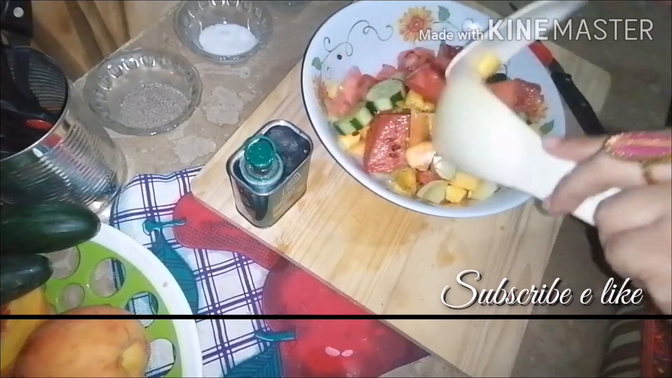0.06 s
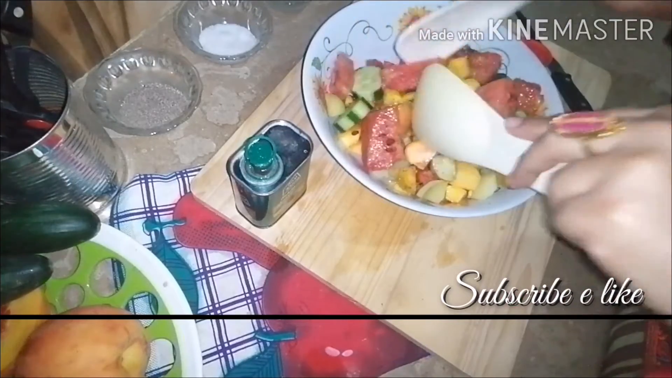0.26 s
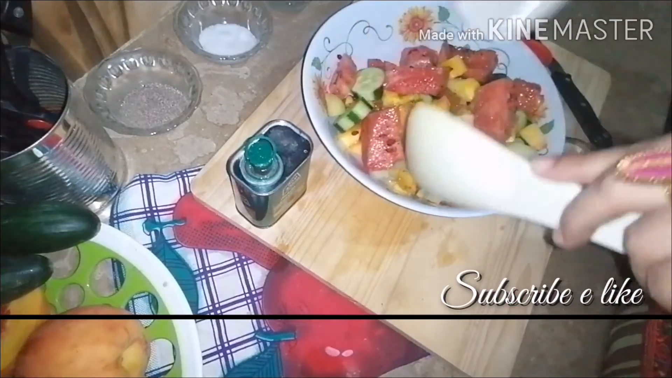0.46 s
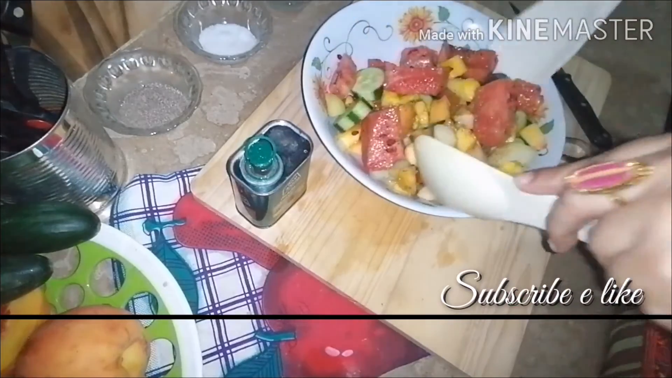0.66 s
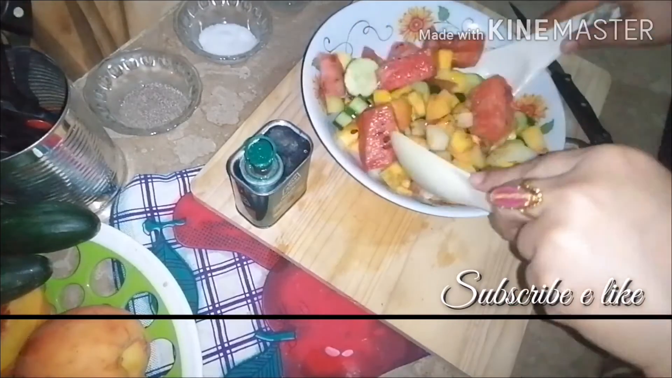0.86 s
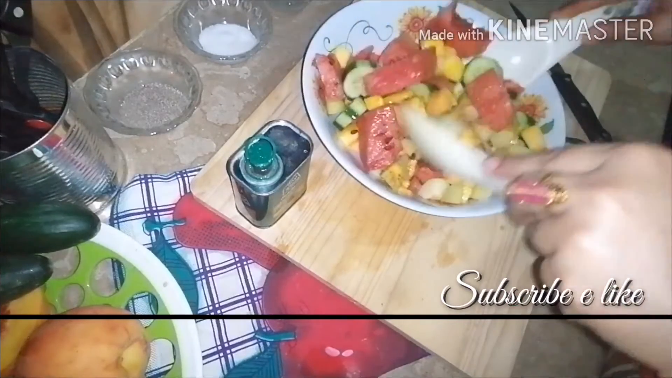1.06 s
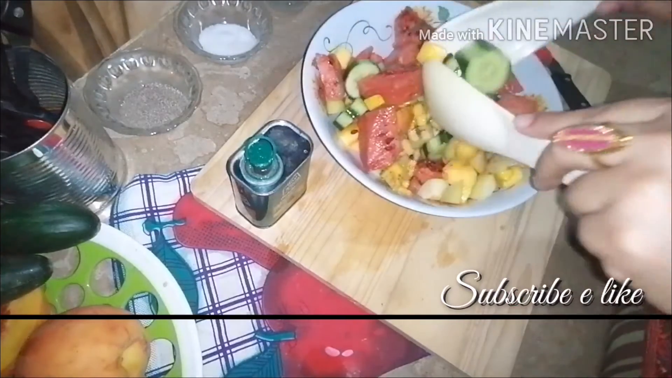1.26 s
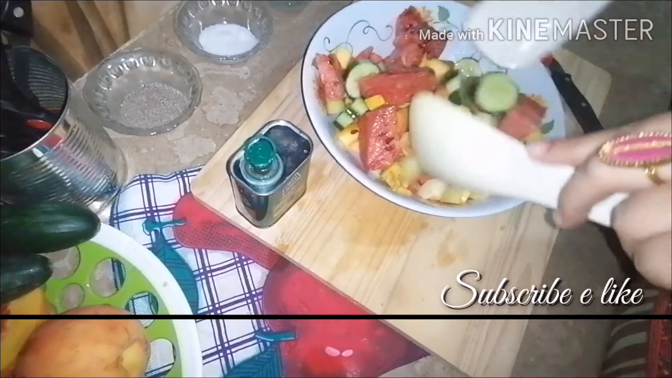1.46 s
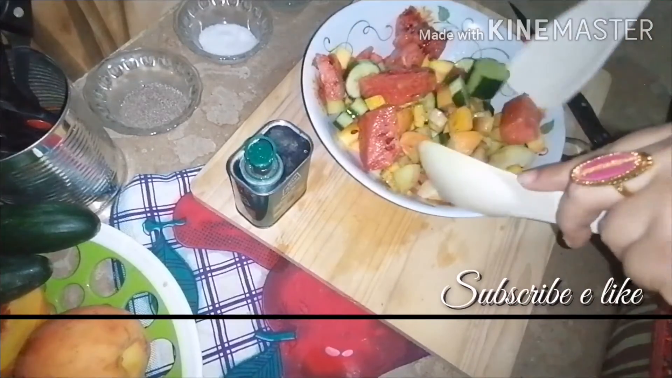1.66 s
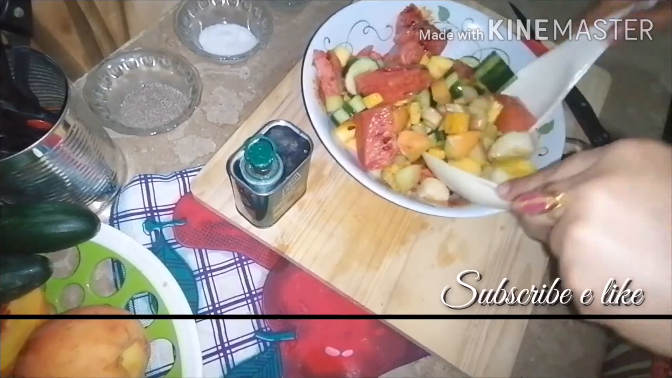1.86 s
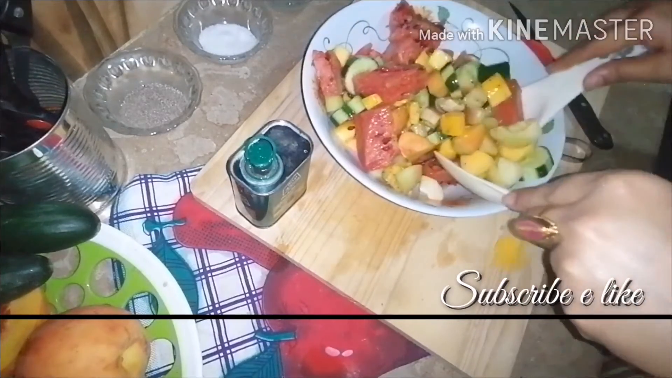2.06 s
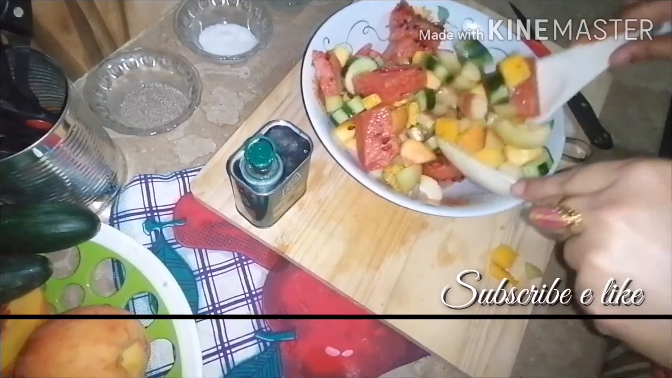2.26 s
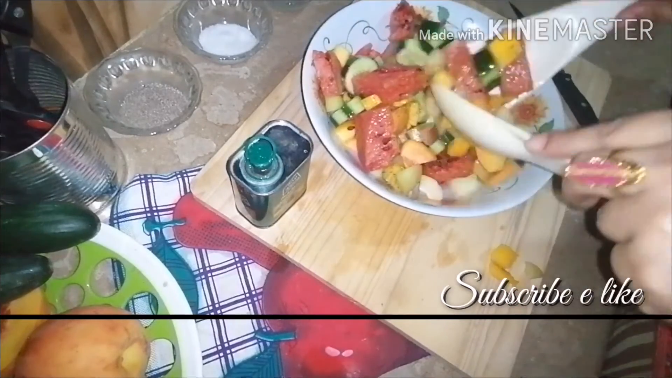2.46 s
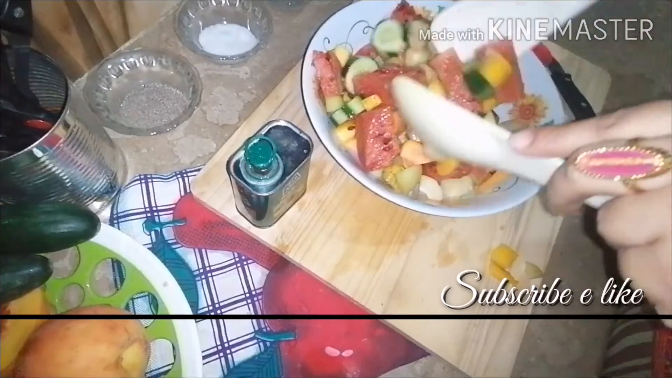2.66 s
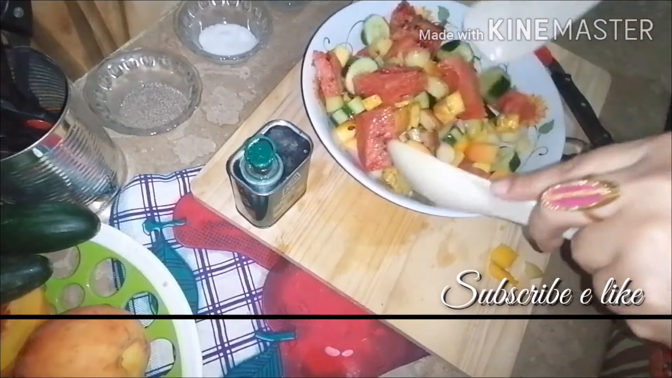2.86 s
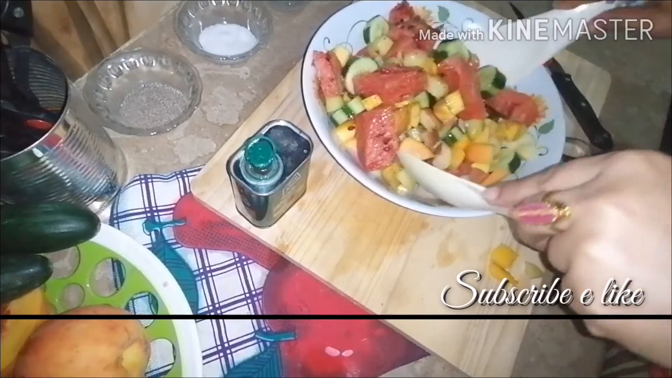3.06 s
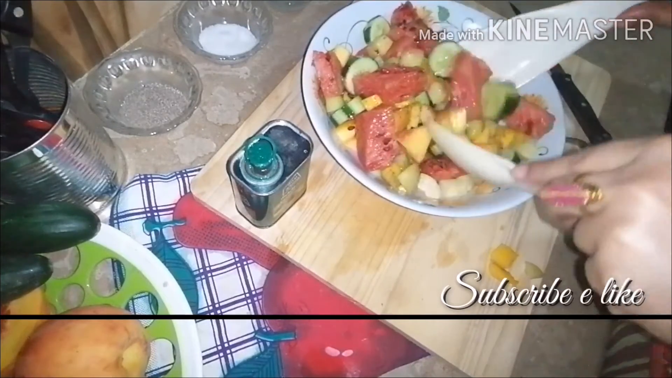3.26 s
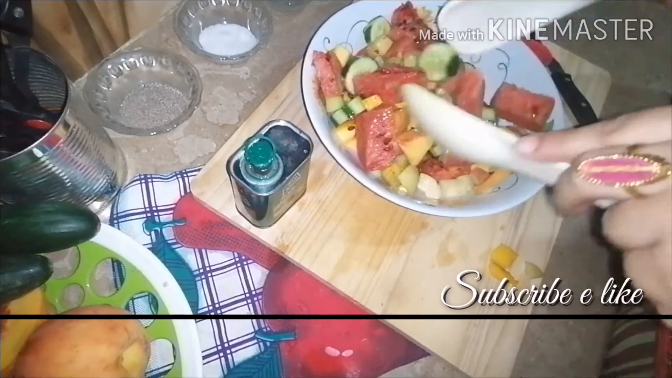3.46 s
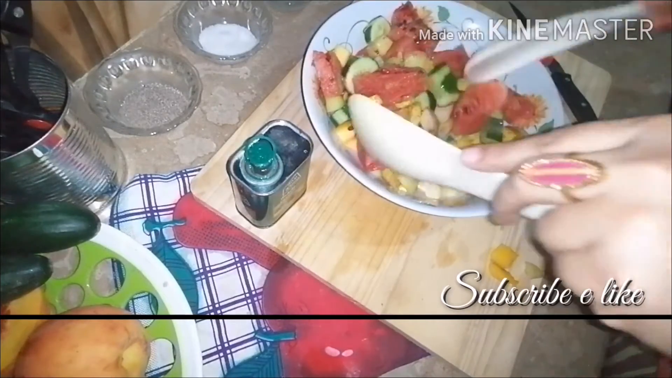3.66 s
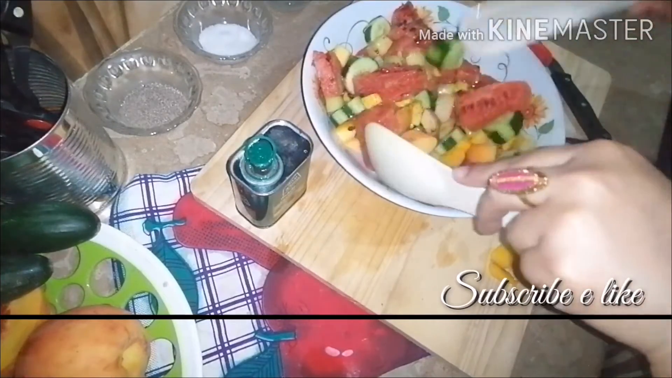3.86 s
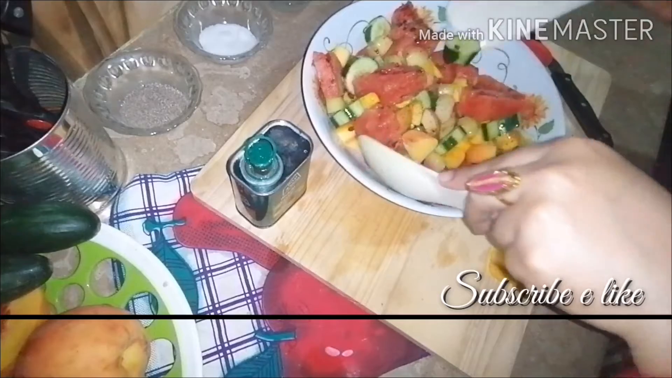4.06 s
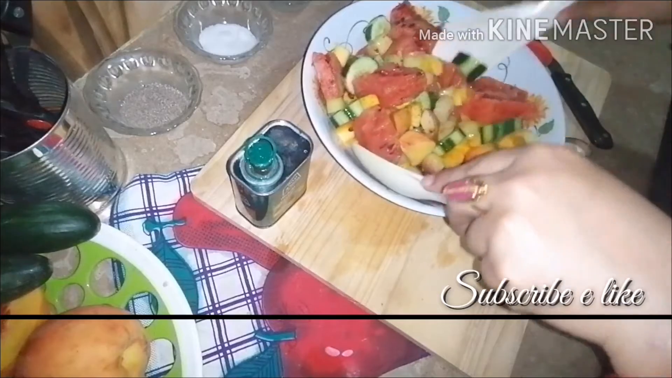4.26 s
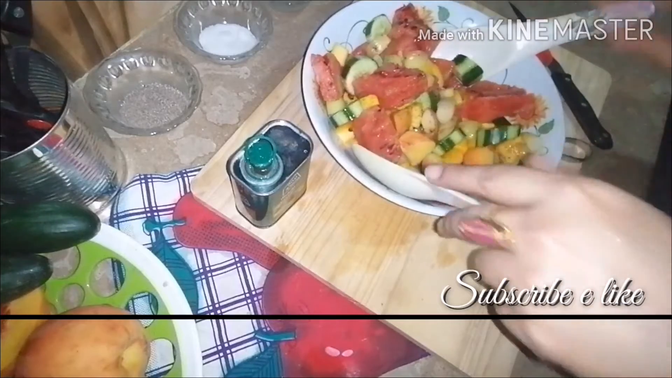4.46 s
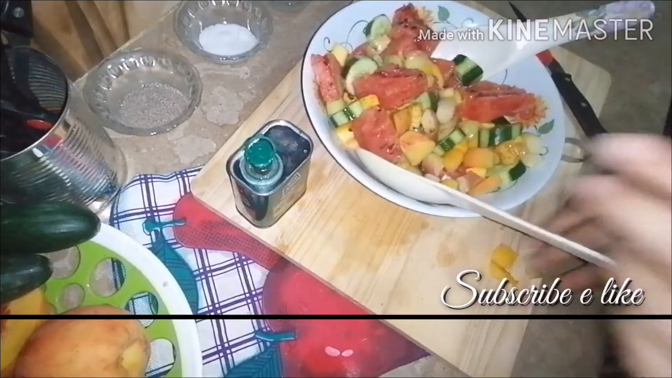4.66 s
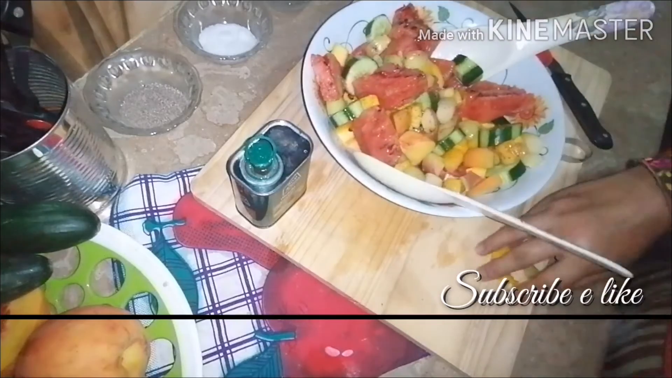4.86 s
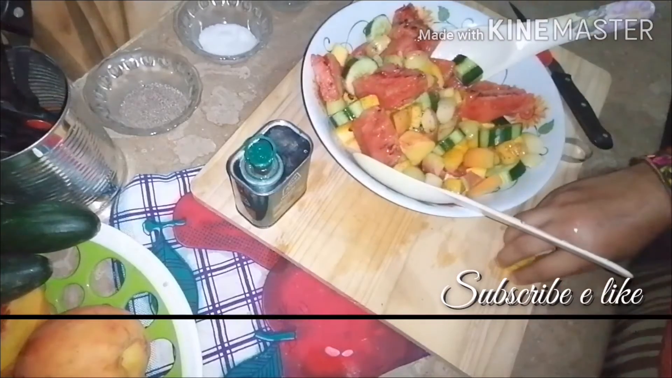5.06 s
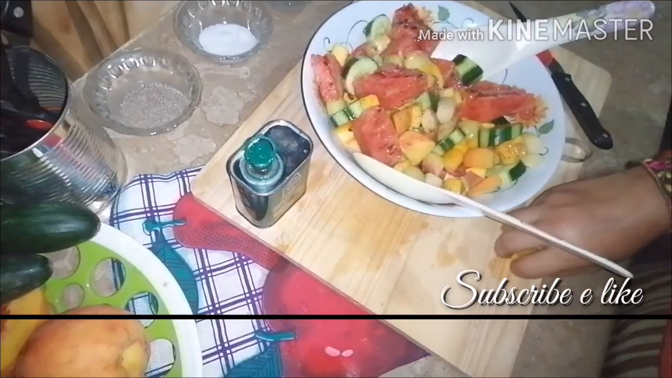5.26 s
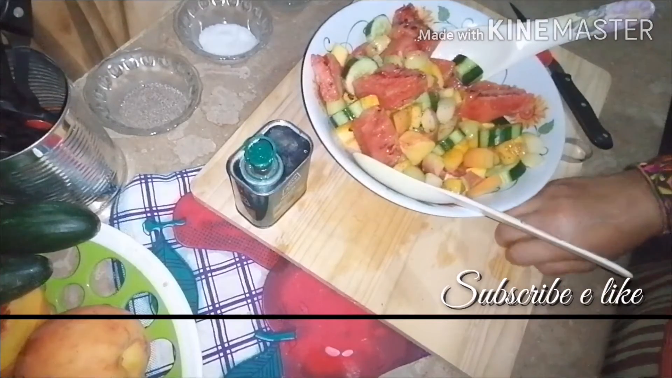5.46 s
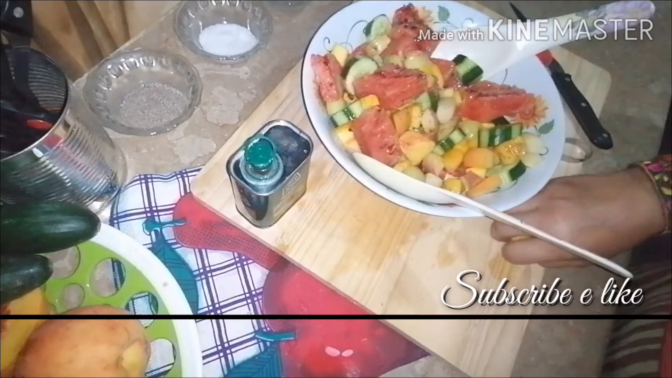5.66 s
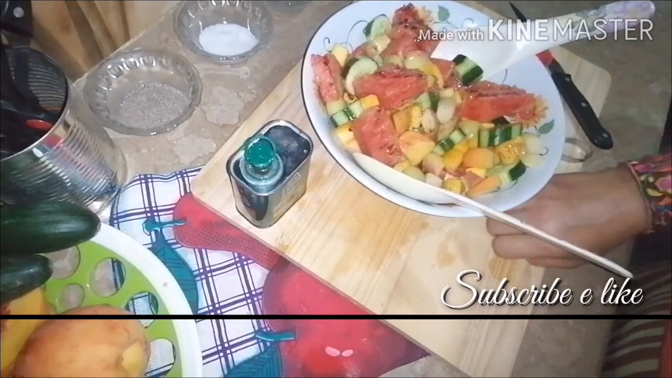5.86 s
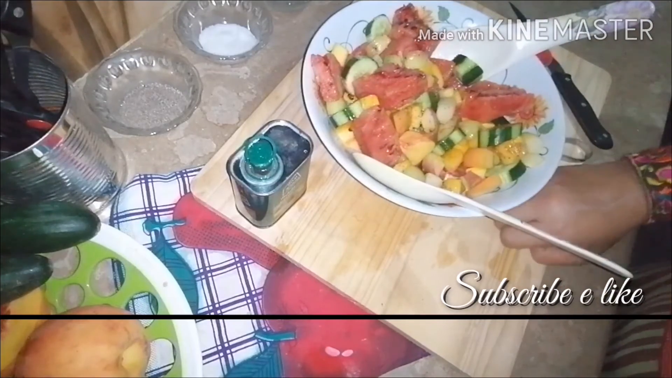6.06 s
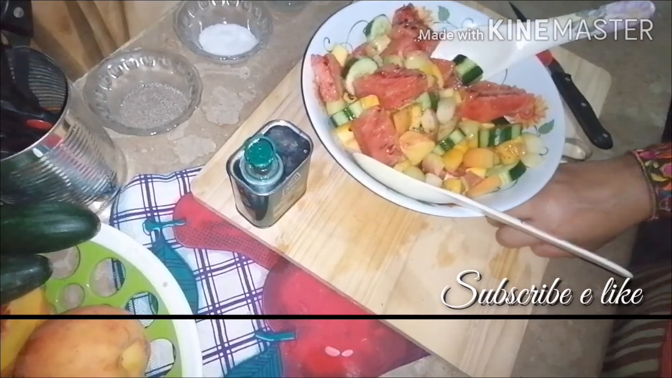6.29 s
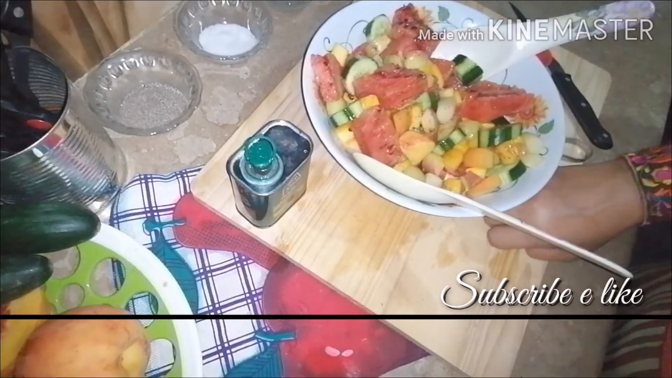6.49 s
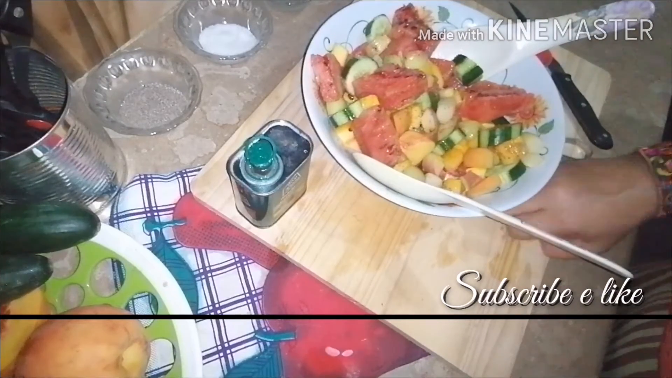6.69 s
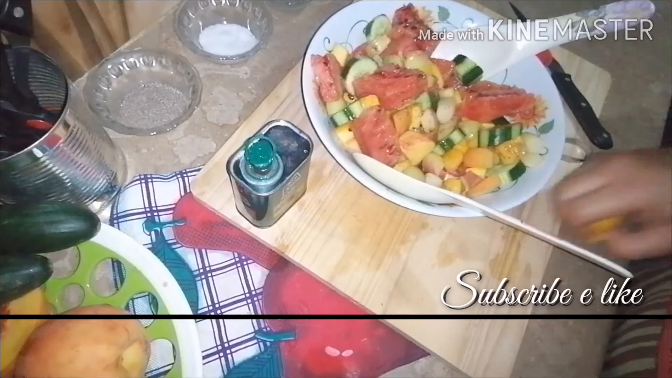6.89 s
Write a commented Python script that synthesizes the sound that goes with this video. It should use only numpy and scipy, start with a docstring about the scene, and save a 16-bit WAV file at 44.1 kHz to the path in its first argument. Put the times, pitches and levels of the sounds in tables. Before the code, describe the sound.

Chopped salad is tossed with plastic spoons, giving irregular knocks on the bowl, light taps and soft, moist scraping.

```python
"""Quiet kitchen air, wavering low tones and a soft rustle come first: two plastic spoons are tossing
a chopped salad in a bowl on a wooden board. Friction along the wall makes the rustle, with a thin
high hiss and a low rumble behind it. Light taps, then sharper knocks, excite the damped modes of
board, bowl and spoon, and the small room reverberates. Two microphones a hand apart hear it all."""
import sys
import numpy as np
from scipy import signal
from scipy.fft import rfft, irfft, next_fast_len
from scipy.io import wavfile
from scipy.ndimage import uniform_filter1d

SR = 44100
rng = np.random.default_rng(int(sys.argv[2]) if len(sys.argv) > 2 else 0)


def dump_mix(stems):
    """Bounce the given channels to the path in sys.argv[1] as a 16-bit WAV at rate SR."""
    frames = np.atleast_2d(stems).T  # one column per channel
    limited = np.clip(frames, -1, 1)  # hard clip at full scale
    pcm = np.round(limited * 32767).astype(np.int16)
    wavfile.write(sys.argv[1], SR, pcm)


N = 305480


def gain_of(db):
    """Amplitude ratio of a level in decibels."""
    return 10 ** (np.asarray(db) / 20)

def unit_rms(x):
    """Normalisation to unit mean power."""
    return x / np.sqrt(np.mean(x ** 2) + 1e-20)

def curve_at(points, hz):
    """Interpolation on a logarithmic frequency axis."""
    point_hz, value = np.transpose(points)
    return np.interp(np.log(hz + 1), np.log(point_hz + 1), value)

def filtered(x, db_of_hz):
    """Zero-phase filtering by a level given as a function of frequency."""
    size = next_fast_len(N)
    hz = np.fft.rfftfreq(size, 1 / SR)
    return irfft(rfft(x, size) * gain_of(db_of_hz(hz)), size)[..., :N]

def band(noise, centre_hz, width_hz):
    """Band-pass filtering by one Lorentzian peak, at unit rms."""
    peak_db = lambda hz: -20 * np.log10(1 + (2 * (hz - centre_hz) / width_hz) ** 2)
    return unit_rms(filtered(noise, peak_db))

def resonances_db(hz, centres, gains, spread, valley):
    """Resonance peaks add in power over a flat valley; spread is half width over pitch."""
    detuning = (hz[:, None] - centres) / (spread * centres)
    return 10 * np.log10(valley + (gains ** 2 / (1 + detuning ** 2)).sum(1))

def minimum_phase(db):
    """Causality: a minimum-phase spectrum lets nothing sound before the blow."""
    cepstrum = irfft(db * np.log(10) / 20)
    cepstrum[..., 1:len(db) - 1] *= 2
    cepstrum[..., len(db):] = 0
    return np.exp(rfft(cepstrum))


# Spectrum of the room air: frequency_hz, density_db
AIR_SPECTRUM = [(12, -36), (20, -12.5), (103, -13.5), (189, -12), (279, -15.5), (312, -13.5), (359, -9),
                (642, -10.5), (698, -14), (1000, -14.5), (2300, -23.5), (4480, -33), (5010, -25),
                (6250, -38), (10000, -38.5), (15200, -29)]
# Likeness of the air at the two microphones: frequency_hz, correlation
AIR_CORRELATION = [(60, -0.0084), (240, 0.67), (950, 0.2), (3770, -0.3), (15000, -0.72)]
# Balance of the air: frequency_hz, left_over_right_db
AIR_BALANCE = [(60, 8.5), (240, -3.5), (950, 1.5), (3770, 0), (15000, 2.5)]

def room_air():
    """Partial coherence: spaced microphones share only part of a noise that drifts in patches."""
    frames, hz = N // 256 + 5, np.fft.rfftfreq(1024, 1 / SR)
    real, imag, other_real, other_imag, patches = rng.standard_normal((frames, 513, 5)).T
    drift_db = 2.37 * unit_rms(uniform_filter1d(uniform_filter1d(patches, 8, 0), 12, 1))
    shared = curve_at(AIR_CORRELATION, hz)[:, None]
    left = real + 1j * imag
    right = shared * left + np.sqrt(1 - shared ** 2) * (other_real + 1j * other_imag)
    level_db = curve_at(AIR_SPECTRUM, hz)[:, None] + drift_db
    lean_db = curve_at(AIR_BALANCE, hz)[:, None] / 2
    spectra = np.array([left * gain_of(level_db + lean_db), right * gain_of(level_db - lean_db)])
    return gain_of(-63.5) * unit_rms(signal.istft(spectra, nperseg=1024, noverlap=768)[1][:, :N])


# Appliance tones: pitch_hz, width_hz, relative_level_db
HUM_TONES = [(45, 9.1, -76.5), (98.34, 1.7, -73), (129.8, 8, -75), (146.64, 8.1, -75.5), (5070, 70, -87.5)]

def appliance_hum():
    """Narrow-band noise: neighbouring frequencies interfere, so each tone swells and fades."""
    tones = sum(gain_of(db) * band(rng.standard_normal(N), hz, width) for hz, width, db in HUM_TONES)
    return tones * gain_of([[3.5], [-1.5]])  # left, right


# Spoon strokes through the salad: start_s, length_s, dull_db, bright_db, rim_db, change_db
SPOON_STROKES = [(0.0, 0.46, -75.5, -71.5, -88, 6), (0.585, 0.22, -81, -83, -87, 0),
                 (0.836, 0.28, -45, -45, -81, -17.5), (1.13, 0.34, -65, -64, -92, -11),
                 (1.498, 0.29, -74, -77, -87, -3.5), (1.794, 0.2, -56.5, -53.5, -71, -1.5),
                 (1.991, 0.2, -56, -54, -65, -1), (2.228, 0.26, -71.5, -68, -74, -8),
                 (2.434, 0.58, -75, -73, -78, -5), (3.119, 0.43, -58.5, -55.5, -67.5, -22),
                 (3.546, 0.41, -77.5, -77.5, -104, 0.5), (3.989, 0.37, -63.5, -59.5, -74, -6),
                 (4.285, 0.23, -57.5, -54.5, -63, -7), (4.778, 0.2, -71, -67.5, -76, -3.5),
                 (4.966, 0.16, -69, -74, -60, -11), (5.225, 0.24, -71, -83, -80, -1)]
REST_DB, RISE_S = [[-84], [-81], [-103.5]], [[0.046], [0.076], [0.046]]  # dull, bright, rim
LIFT_DB_PER_S = 254

def stroke_envelopes():
    """Incoherent sources add in power: each stroke rises, drifts in level and lifts off."""
    t = np.arange(N) / SR
    power = gain_of(REST_DB) ** 2 * np.ones(N)
    for start_s, length_s, *levels_db, change_db in SPOON_STROKES:
        age_s = t - start_s
        rise = np.clip(age_s / np.array(RISE_S), 0, 1) if start_s > 0 else 1
        lift = gain_of(-LIFT_DB_PER_S * np.maximum(age_s - length_s, 0))
        drift_db = change_db * np.clip(age_s / length_s, 0, 1)
        power += (rise * lift * gain_of(np.array(levels_db)[:, None] + drift_db)) ** 2
    return np.sqrt(power)


# Spectrum of the rubbing as heard, with a microphone resonance near 7 kHz: frequency_hz, density_db
FRICTION_SPECTRUM = [(240, -56.5), (400, -38), (473, -13), (542, -24.5), (613, -2.5), (758, -11),
                     (1090, -5), (1670, -16.5), (1830, -7.5), (3420, -8.5), (4110, -10), (7100, 3.5),
                     (15200, -15)]
CRACKLES_PER_S, CROSSOVER_HZ, FIZZ_FROM_HZ = 250, 3900, 10000

def spoon_friction(dull, bright, rim):
    """Forced vibration: dense tiny slips and wet crackle drive the wall and its modes."""
    noise = rng.standard_normal((3, N))
    noise *= gain_of(0.36 * unit_rms(uniform_filter1d(rng.standard_normal(N), 120)))
    crackle = gain_of(1.4 * np.minimum(rng.exponential(1, N), 3))
    crackle *= rng.random(N) < CRACKLES_PER_S / SR
    slips = .5 * noise[2] + 0.58 * noise[:2] * (1 + 60 * uniform_filter1d(crackle, 70))
    mode_hz = np.transpose(BOWL_MODES)[0]
    rim_hz = mode_hz[(mode_hz > 500) & (mode_hz < 1400)]  # the rim sings in its low modes
    modes_db = lambda hz: resonances_db(hz, mode_hz, 0.76, spread=.018, valley=0.34)
    rub_db = lambda hz: curve_at(FRICTION_SPECTRUM, hz) + modes_db(hz)
    cut_db = lambda ratio: 10 * np.log10(1 + ratio ** 12)
    driven = lambda db_of_hz: unit_rms(filtered(slips, db_of_hz))
    scrape = driven(lambda hz: rub_db(hz) - cut_db(hz / CROSSOVER_HZ))
    rustle = driven(lambda hz: rub_db(hz) - cut_db(CROSSOVER_HZ / (hz + 1)))
    wet_fizz = driven(lambda hz: -cut_db(FIZZ_FROM_HZ / (hz + 1)))
    singing = driven(lambda hz: 2 * resonances_db(hz, rim_hz, 0.73, spread=.018, valley=0.0034))
    return dull * scrape + bright * (rustle + gain_of(-13) * wet_fizz) + rim * singing


# Level contours of two background bands: time_s, hiss_db, rumble_db
BAND_LEVELS = [(0.0, -78, -64.5), (0.25, -72, -63), (0.46, -67, -71.5), (0.6, -84.5, -71.5),
               (1.14, -71.5, -72), (1.3, -73, -64.5), (1.43, -81, -75), (1.6, -83, -61), (1.95, -66.5, -78),
               (2.51, -82, -61), (2.96, -86, -69), (3.035, -79, -51.5), (3.12, -76, -79), (3.3, -77, -78),
               (3.42, -67, -68), (3.6, -84, -67.5), (3.8, -97, -68), (4.4, -58, -82), (4.8, -86, -67),
               (5.42, -72, -72), (5.75, -84.5, -73.5), (6.1, -80, -69.5), (6.3, -74, -68.5),
               (6.55, -76.5, -70.5), (6.93, -90, -72)]

def hiss_and_rumble(bright):
    """Amplitude modulation: two noise bands swell and sink; the hiss also follows bright rubbing."""
    time_s, *contours_db = np.transpose(BAND_LEVELS)
    hiss_gain, rumble_gain = (gain_of(np.interp(np.arange(N) / SR, time_s, db)) for db in contours_db)
    noise = rng.standard_normal((3, N))
    hiss = band(noise[:2], centre_hz=7350, width_hz=380)
    rumble = band(noise[2] + 0.68 * noise[:2], centre_hz=130, width_hz=208)
    return np.hypot(hiss_gain, bright * gain_of(-14.5)) * hiss + rumble_gain * rumble


# Spectral zones (board thud, hollow, rim, wall, spoon, clack, tick): centre_hz
ZONE_CENTRES = [280, 620, 1100, 1950, 3200, 6500, 11500]
# Light taps of pieces and spoon tips: start_s, level_db, left_over_right_db, centre_hz,
# fall_below_db_per_octave, fall_above_db_per_octave, rattle_t60_s
LIGHT_TAPS = [(0.085, -62, -3, 2900, 5, 1, 0.045), (0.097, -64.5, -3, 570, -8.5, 1, 0.056),
              (0.167, -61, -12, 900, 4, 8, .036), (0.249, -67, -10, 2910, 5, 10, .04),
              (0.347, -50.5, -1, 8400, 8, 11, 0.074), (0.459, -63, -18, 7000, 18, 19, 0.032),
              (0.589, -33.5, -4.5, 6450, 18, 19, 0.041), (0.669, -62, -10, 4490, 8, 15, .03),
              (1.228, -62, -2, 2810, 22, 4, .06), (1.357, -43, -3, 1058, 7, 30, 0.085),
              (1.394, -38.5, -1.5, 8330, 18, 38, 0.065), (1.447, -65.5, -3, 7100, 1, -7, 0.034),
              (1.627, -46.5, -4, 627, 2.5, 14, 0.032), (1.708, -57.5, -7, 7330, 6, 12, 0.062),
              (2.301, -42.5, 4.5, 614, 12.5, 15.5, 0.036), (2.334, -44.5, -1, 624, 21, 35, 0.047),
              (2.953, -60.5, 0, 8340, 1, 7, 0.17), (2.983, -53, 0, 265, 0, 26, 0.041),
              (2.997, -47.5, 1.5, 4560, 14, 3, 0.069), (3.026, -48, 6, 262, 0, 5, 0.054),
              (3.03, -52, 4, 8100, 12, 6, .06), (3.48, -61, -2, 3300, 18, 14, 0.056),
              (3.757, -56.5, -7, 7100, 20, 16, .04), (3.823, -60.5, -1, 4490, 12, 5, 0.1),
              (3.91, -60, -11, 7330, 11, 16, 0.053), (5.317, -56, -19, 2360, 17, 21, .02),
              (5.441, -64, -1, 1810, 0, 3, .06)]

def taps():
    """Contact time goes with pitch: low taps come from soft pieces and build up slowly."""
    for start_s, level_db, pan_db, hz, fall_below, fall_above, rattle_s in LIGHT_TAPS:
        octaves = np.log2(np.array(ZONE_CENTRES) / hz)
        fall_db = np.where(octaves < 0, fall_below * octaves, -fall_above * octaves)
        zone_db = np.maximum(fall_db, -41.5)
        ring_factor = 0.66 + .12 * np.log2(7000 / hz)  # low taps linger
        contact_s = CONTACT_S + 1.6 / hz
        yield start_s, level_db, pan_db, zone_db, rattle_s, ring_factor, contact_s, [hz]


# Spoon knocks: start_s, level_db, body_db, wall_db, edge_db, left_over_right_db, rattle_t60_s,
# ring_factor (set by the damping of hands and salad), then three favoured_hz of the struck spot
SPOON_KNOCKS = [(0.779, -13.5, 0, 1, -12, -5, 0.054, 1.8, 1068, 3330, 6770),
                (0.856, -17.5, 2, 4, 9.5, -4.5, 0.042, 0.92, 1110, 3450, 7400),
                (0.988, -33.5, 15.5, -11, -11, -1, 0.039, 0.95, 630, 1860, 7000),
                (1.803, -16.5, -2, 1, 0.5, -3, 0.05, 2.2, 1310, 2810, 7700),
                (1.883, -22, 3.5, 6, 10, -2, 0.047, 1.03, 1056, 2890, 5560),
                (2.091, -25.5, 4.5, 3.5, -2.5, 1.5, 0.069, 0.71, 1030, 2960, 7600),
                (2.12, -47, 8, 26.5, 4, 0, 0.019, 2, 1030, 2460, 7380),
                (3.113, -21, -6.5, 3, 9.5, -0.5, 0.048, 2.5, 1070, 2920, 7900),
                (4.008, -15, -6.5, -8.5, -5.5, -1.5, 0.051, 3, 1060, 2940, 6340),
                (4.268, -44, 0, 3, 4, 6.5, 0.075, 0.81, 1170, 1830, 8150),
                (4.296, -21.5, 9, -1.5, 9.5, -4, 0.034, 1.06, 1047, 3200, 7250),
                (4.409, -45, 13.5, 6, -10, -9, .051, 1.5, 1030, 1820, 7240),
                (4.508, -34, 11, 8, -5.5, -1.5, 0.045, 1.4, 1043, 2160, 3180),
                (4.548, -59.5, 22, 22.5, -12, -11, .045, 1.4, 1030, 2090, 3210),
                (4.968, -25.5, 4.5, 7, -14.5, -2.5, 0.07, 2.4, 1134, 2760, 5100),
                (5.038, -31, 8, 2.5, -12, -2, 0.064, 1.15, 1370, 1830, 6980),
                (5.099, -38.5, 9.5, 5.5, -14.5, -3, 0.063, 1.6, 1140, 1540, 6800)]
# Spectrum of a plain knock, one value a zone: relative_level_db
PLAIN_KNOCK = [-46.5, -28, -19, -20.5, -17.5, -11, -19]
# How far each zone follows body_db, wall_db and edge_db: weight
BODY_WEIGHTS = [0.99, 1.2, 0.74, 0.12, 0.43, 0.12, 0.18]
WALL_WEIGHTS = [0.31, 0, 0.3, 0.93, 0.13, 0.16, 0.055]
EDGE_WEIGHTS = [0.18, 0.18, 0.1, 0.084, 0.077, 0.4, 0.82]
CONTACT_S = .0015

def knocks():
    """Point of excitation: where the spoon lands sets the energy in each zone."""
    weights = np.array([BODY_WEIGHTS, WALL_WEIGHTS, EDGE_WEIGHTS])
    for start_s, level_db, body, wall, edge, pan_db, rattle_s, ring_factor, *spot_hz in SPOON_KNOCKS:
        zone_db = PLAIN_KNOCK + np.array([body, wall, edge]) @ weights
        yield start_s, level_db, pan_db, zone_db, rattle_s, ring_factor, CONTACT_S, spot_hz


# Modes of board, bowl and spoon: pitch_hz, level_db, t60_s
BOWL_MODES = [(150.6, -22, 0.0584), (263.3, 12, 0.017), (599.2, -5.5, 0.089), (652, -3, 0.047),
              (730, -21, 0.057), (868, -5, 0.13), (1028, 1.5, 0.043), (1103.6, 5.5, 0.037),
              (1188, -4, 0.012), (1356, -0.5, 0.044), (1572, -3, 0.034), (1847, -7, 0.092),
              (2060, -12.5, 0.068), (2450, -10.5, 0.0388), (2817, -1, 0.053), (2997, 2.5, 0.019),
              (3275, -2.5, 0.055), (3366, -1.5, 0.057), (4490, -18, 0.016), (4756, 1.5, 0.0093),
              (5347, 4, 0.0173), (5670, -7, 0.017), (6730, -5.5, 0.019), (7040, 9, 0.026),
              (7760, -12, 0.0098), (8370, 8.5, 0.016), (8880, 0, 0.0057)]
BLOW_SAMPLES, BEAT_DEPTH, CRACK_DB, CRACK_T60_S = 6144, 0.52, -7, .012
BLOW_BINS_HZ = np.fft.rfftfreq(BLOW_SAMPLES, 1 / SR)

def struck_bowl(chance, grit, rattle_s, ring_factor, contact_s, spot_hz):
    """Modal superposition: the spectrum of one blow is damped sinusoids plus a dry rattle."""
    t = np.arange(BLOW_SAMPLES) / SR
    hz, mode_db, t60_s = np.transpose(BOWL_MODES)
    # modes favoured by the struck spot are louder and linger
    favoured = np.exp(-(np.log(hz[:, None] / spot_hz) / .035) ** 2).max(1)
    gains = gain_of(mode_db + 9 * favoured + 3.5 * chance[0])
    ring_s = ring_factor * t60_s * (1 + 0.27 * favoured)
    decay = gains[:, None] * gain_of(-60 * t / ring_s[:, None])
    phase = 2 * np.pi * (hz * (1 + .004 * chance[1]))[:, None] * t
    lags = np.clip(hz / 1800, 0, 3) * chance[2:]  # high modes reach the microphones out of step
    beat_hz = .012 * hz * (1 + 0.46 * chance[1])  # an uneven bowl splits each mode into a pair
    beat = 1 + BEAT_DEPTH * np.cos(2 * np.pi * beat_hz[:, None] * t)
    ring = np.array([(decay * beat * np.sin(phase + lag[:, None])).sum(0) for lag in lags])
    crack = gain_of(CRACK_DB - 60 * t / CRACK_T60_S)
    rattle = (0.52 * grit[2] + 1.48 * grit[:2]) * (gain_of(-60 * t / rattle_s) + crack)
    response = minimum_phase(resonances_db(BLOW_BINS_HZ, hz, gains, spread=0.033, valley=0.49))
    contact = np.minimum(t / contact_s, 1)  # soft plastic and fruit: contact builds up
    return rfft(ring * contact) + 4.8 * rfft(rattle * contact) * response


# Uneven radiation of the bowl: frequency_hz, left_over_right_db
BOWL_DIRECTIVITY = [(300, 9.5), (1100, 7.5), (3500, 3.5), (8000, 4.5), (13000, 9.5)]
PEAK_TO_ENERGY_DB = 22.5

def radiated_blows():
    """Directivity: taps and knocks, weighted by zone, reach the two microphones unequally."""
    echo_groups = np.zeros((3, 2, N))  # blows take turns among three room echoes, so their tails differ
    across_zones = lambda values: curve_at(list(zip(ZONE_CENTRES, values)), BLOW_BINS_HZ)
    zone_masks = np.array([across_zones(row) for row in np.eye(len(ZONE_CENTRES))])
    directivity_db = curve_at(BOWL_DIRECTIVITY, BLOW_BINS_HZ)
    blows = sorted([*taps(), *knocks()], key=lambda blow: blow[0])
    chance = rng.standard_normal((len(blows), 4, len(BOWL_MODES)))
    grit = rng.standard_normal((len(blows), 3, BLOW_SAMPLES))
    for k, (start_s, level_db, pan_db, zone_db, *strike) in enumerate(blows):
        spectrum = struck_bowl(chance[k], grit[k], *strike)
        zone_energy = zone_masks @ (abs(spectrum) ** 2).mean(0) / BLOW_SAMPLES
        boost_db = zone_db - 10 * np.log10(zone_energy)
        colour_db = curve_at([(80, boost_db[0] - 29), *zip(ZONE_CENTRES, boost_db)], BLOW_BINS_HZ)
        spectrum *= minimum_phase(colour_db + level_db + PEAK_TO_ENERGY_DB)
        balance = gain_of(np.array([[.5], [-.5]]) * (pan_db + directivity_db))
        start = round(start_s * SR)
        echo_groups[k % 3, :, start:start + BLOW_SAMPLES] += irfft(spectrum * balance)
    return echo_groups


# Reverberation time of the kitchen: frequency_hz, t60_s
KITCHEN_DECAY = [(200, 0.72), (1000, 0.48), (4000, 0.64), (12000, 0.41)]

def reverberation(direct):
    """Convolution with sparse reflections of random sign, each band dying at its own rate."""
    echoes = np.zeros((2, SR))
    arrivals = np.arange(300, SR - 20, 20) + rng.integers(0, 20, (2, (SR - 301) // 20))
    np.put_along_axis(echoes, arrivals, rng.choice([-1., 1.], arrivals.shape), 1)
    hz, t, spectra = signal.stft(echoes, SR, nperseg=256)
    decay = gain_of(-60 * t / curve_at(KITCHEN_DECAY, hz)[:, None])
    tail = signal.istft(spectra * decay, SR, nperseg=256)[1]
    return signal.fftconvolve(direct, tail / np.linalg.norm(tail[0]), axes=1)[:, :N]

def scene():
    """Superposition: blows and their room tails add to rubbing, hiss, rumble, air and hum."""
    echo_groups = radiated_blows()
    tails = gain_of(-12) * sum(reverberation(group) for group in echo_groups)
    dull, bright, rim = stroke_envelopes()
    rustle = spoon_friction(dull, bright, rim) + hiss_and_rumble(bright)
    rustle *= gain_of([[2.5], [.5]])  # left, right
    return room_air() + appliance_hum() + rustle + echo_groups.sum(0) + tails


# Treble response of the microphones: frequency_hz, gain_db
MICROPHONE_RESPONSE = [(11000, -1.5), (14000, -9), (15000, -6.5), (15500, -23), (16300, -27)]
SELF_NOISE_DB, NOISE_FROM_HZ, NOISE_TO_HZ, BAND_LIMIT_HZ = -84, 10500, 15200, 16300

def record(dry):
    """Limited bandwidth: the microphones dull the top octave and add faint hiss before a low-pass."""
    dulled = filtered(dry, lambda hz: curve_at(MICROPHONE_RESPONSE, hz))
    noise_db = lambda hz: -10 * np.log10(1 + (NOISE_FROM_HZ / (hz + 1)) ** 8 + (hz / NOISE_TO_HZ) ** 200)
    self_noise = gain_of(SELF_NOISE_DB) * filtered(rng.standard_normal((2, N)), noise_db)
    low_pass = signal.firwin(511, BAND_LIMIT_HZ, window=("kaiser", 9), fs=SR)
    return signal.oaconvolve(dulled + self_noise, low_pass[None], "same")


dry = scene()
out = record(dry)
dump_mix(out)
```